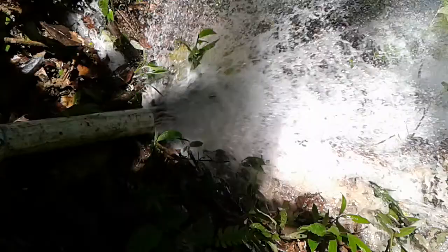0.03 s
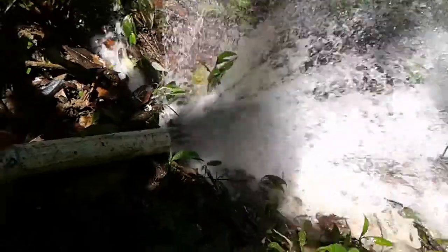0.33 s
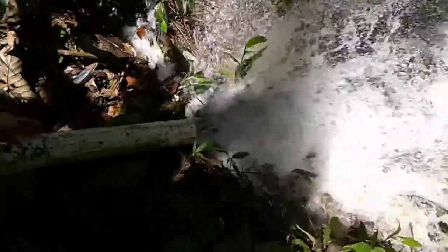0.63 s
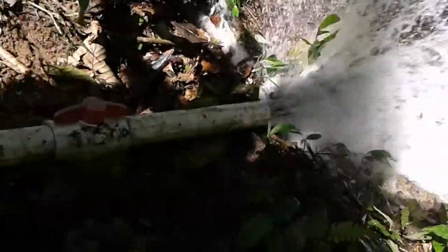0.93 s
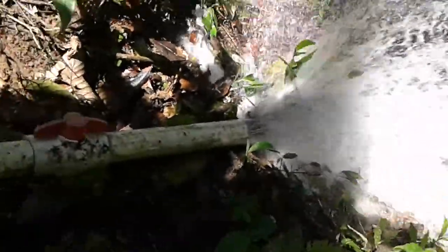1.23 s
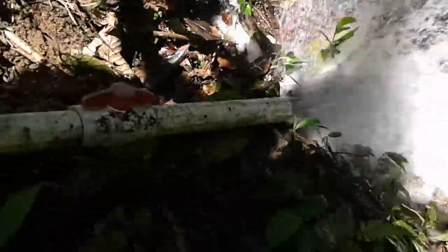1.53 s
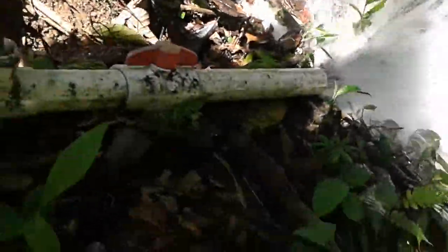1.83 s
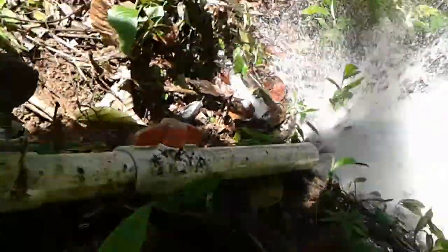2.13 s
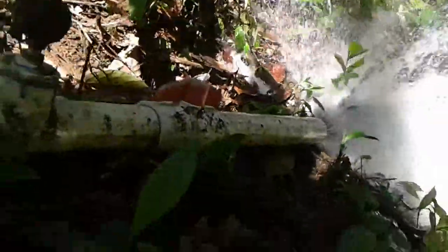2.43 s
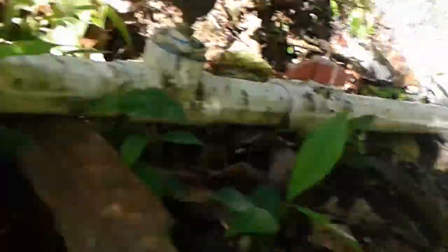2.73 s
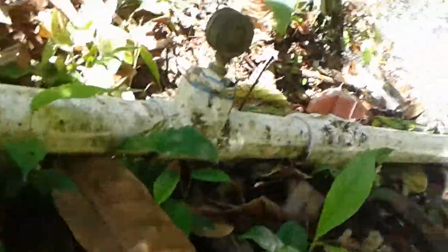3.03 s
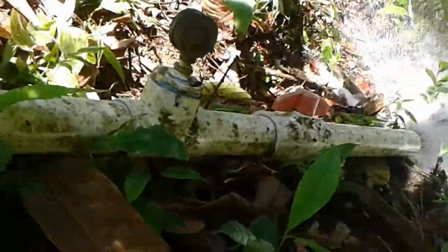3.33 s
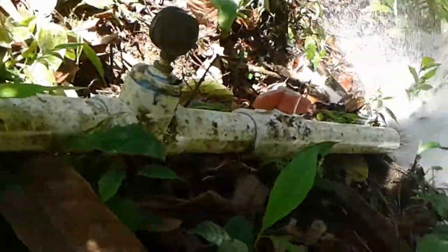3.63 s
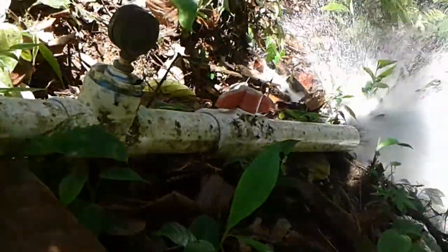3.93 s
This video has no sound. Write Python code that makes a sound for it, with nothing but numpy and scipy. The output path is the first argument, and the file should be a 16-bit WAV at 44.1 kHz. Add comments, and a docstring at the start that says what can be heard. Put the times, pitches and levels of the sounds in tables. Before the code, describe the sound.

A steady hissing jet of water gushes from a pipe and splashes onto the ground outdoors.

```python
"""Water under pressure fans out of an open pipe end and beats on leaves and soil, outdoors.
After a short silence the spray fades in, mono and close to the nozzle: the jet hisses, fine droplets
crackle in it, heavier slugs splat on the ground and tiny bubbles ring. From about 1.5 s the microphone
backs away along the pipe, and at 1.9 s one larger bubble plinks. By 2.8 s the move has settled:
the hiss is softer, the body fuller, and the water runs on to the end."""
import sys
import numpy as np
from scipy import signal
from scipy.fft import rfft, irfft
from scipy.io import wavfile
from scipy.ndimage import uniform_filter1d, map_coordinates

SR = 44100
rng = np.random.default_rng(int(sys.argv[2]) if len(sys.argv) > 2 else 0)


def store_pcm(level_fs):
    """Save levels as 16-bit WAV."""
    pcm = np.round(np.clip(level_fs, -1, 1) * 32767).astype(np.int16)
    wavfile.write(sys.argv[1], SR, np.atleast_2d(pcm).T)


N = 176400

# Tone of the spray beside the nozzle: frequency_hz, relative_gain_db
NOZZLE_EQ = [(20, -36), (45, -37), (90, -24.5), (155, -17), (290, -12), (420, -15), (520, -11), (720, -8),
             (1130, -9), (1400, -7), (1900, -5.5), (2250, -8), (2950, -9), (3700, -14), (4600, -7),
             (5500, -3), (6150, -4), (7200, 1), (7750, -0.9), (8200, -1), (9400, -7), (10600, -6.5),
             (11900, -9.5), (13900, -8), (15700, -11)]
# Tone of the spray beside the valve: frequency_hz, relative_gain_db
VALVE_EQ = [(20, -36), (45, -39), (90, -21.5), (155, -17), (270, -10.5), (390, -14), (650, -6), (800, -9.5),
            (1150, -9.5), (1800, -6), (2250, -10), (2700, -7), (3300, -9.5), (4000, -12.5), (5000, -7.5),
            (5800, -2.5), (6650, -4), (7300, -0.8), (7700, -0.3), (8400, -6), (8950, -9.5), (9450, -5.5),
            (10700, -6.5), (12100, -10), (13700, -9), (15100, -12), (15700, -14)]
# Tone of the spray from behind, further along the pipe: frequency_hz, relative_gain_db
PIPE_EQ = [(20, -34), (45, -37), (90, -22.5), (160, -11.5), (230, -14), (320, -10), (380, -12), (490, -5.5),
           (590, -11.5), (660, -7.5), (760, -9), (1050, -7.5), (1770, -5.5), (2150, -7), (3400, -9),
           (4100, -11.5), (5700, -4), (6500, -3.5), (7400, -0.5), (8800, -4.5), (9700, -4.5), (11000, -4),
           (12000, -11), (13700, -8), (15000, -12.5), (15700, -12.5)]
# The microphone's move: time_s, position (0 nozzle, 1 valve, 2 further along the pipe)
MIC_PATH = [(.7, 0.05), (1.45, 0.16), (1.85, 0.67), (2.35, 1.2), (2.8, 1.95), (4, 1.8)]
# Strength of the flow, a fader on the whole spray: time_s, level_db
FLOW_FADER = [(.7, -17.5), (1.2, -17.5), (1.75, -17.5), (2.3, -17), (2.8, -18), (3.3, -17.9), (4, -17.5)]
# Trim on the jet's hiss and crackle: time_s, gain_db
JET_TRIM = [(.6, -.7), (1.1, 0.23), (1.75, 0.53), (2.3, 0.1), (2.8, 0), (3.3, -0.2), (4, -0.5)]
# Lag of the ground bounce behind the direct sound: time_s, delay_ms
BOUNCE_DELAY = [(.5, 1.55), (1.3, 1.3), (2.1, 1.8), (2.4, 1.85), (2.8, 1.65), (3.4, 1.6), (4, 2.05)]
# Single loud bubbles: start_s, pitch_hz, level_db
PLINKS = [(1.9237, 4800, -11)]

CROSSOVER_HZ = 3850  # splatter lies below, hiss above
HISS_DB, DROPLETS_DB, WASH_DB, SPLATS_DB, BUBBLES_DB = -2, -4, -2.5, -4, -16.5  # balance before EQ


def jet():
    """The sheet of water hisses and sputters while its fine droplets tick."""
    hiss = amp(HISS_DB) * turbulence()
    droplets = amp(DROPLETS_DB) * unit(impacts(per_s=7000, spread_db=3))
    sputter = flutter(depth_db=0.46, rate_hz=90)
    return crossover((hiss + droplets) * sputter, "high") * amp(curve(JET_TRIM))


def splatter():
    """Water churns on the soil and heavier drops slap the leaves."""
    wash = amp(WASH_DB) * turbulence()
    splats = amp(SPLATS_DB) * unit(impacts(per_s=1800, spread_db=2.5))
    churn = flutter(depth_db=0.6, rate_hz=40)
    return crossover((wash + splats) * churn, "low")


def bubbles(low_hz=850, high_hz=5000, pitches=30, per_s=400, decay_cycles=12, glide=0.041):
    """Small bubbles ring briefly, each bending up in pitch."""
    fizz, t = np.zeros(N), np.arange(2048) / SR
    for hz in np.geomspace(low_hz, high_hz, pitches):
        age = t * hz / decay_cycles
        bend = 1 + glide * np.tanh(age / 2)
        ring = np.exp(-age) * np.sin(2 * np.pi * hz * t * bend)
        triggers = impacts(per_s / pitches, spread_db=3)
        fizz += np.sqrt(hz) * signal.oaconvolve(triggers, ring)[:N]  # lift the short, high rings
    return amp(BUBBLES_DB) * unit(fizz)


def plink(start_s, pitch_hz, level_db, attack_s=0.0005, decay_s=0.002):
    """One larger bubble rings out of the spray."""
    t = np.maximum(np.arange(N) / SR - start_s, 0)
    envelope = np.minimum(t / attack_s, 1) * np.exp(-t / decay_s)
    return amp(level_db) * envelope * np.sin(2 * np.pi * pitch_hz * t)


def ground_bounce(direct, gain=0.081, cutoff_hz=3500):
    """The ground throws back a faint, dull copy of the spray, with a drifting delay."""
    delay_samples = curve(BOUNCE_DELAY) * SR / 1000
    delayed = map_coordinates(direct, [np.arange(N) - delay_samples], order=3)
    return gain * signal.sosfiltfilt(signal.butter(1, cutoff_hz, fs=SR, output="sos"), delayed)


def moving_mic(water):
    """Backing along the pipe crossfades three perspectives on the same water."""
    views = [equalise(water, eq) for eq in (NOZZLE_EQ, VALVE_EQ, PIPE_EQ)]
    position = curve(MIC_PATH)
    blend = sum(np.maximum(1 - abs(position - k), 0) * view for k, view in enumerate(views))
    return blend / np.std(views[0])


def turbulence(patch_db=1.0, frame=256):
    """Noise with short-lived brighter and duller patches."""
    spectra = signal.stft(rng.standard_normal(N), nperseg=frame)[2]
    patches = uniform_filter1d(rng.standard_normal(spectra.shape), size=6, axis=0)  # smear in frequency
    patches = unit(uniform_filter1d(patches, size=12, axis=1))  # and in time
    return unit(signal.istft(spectra * amp(patch_db * patches), nperseg=frame)[1][:N])


def impacts(per_s, spread_db):
    """Random clicks, many small and a few large."""
    strength = amp(spread_db * np.minimum(rng.exponential(1, N), 5))
    return strength * rng.choice([-1, 1], N) * (rng.random(N) < per_s / SR)


def flutter(depth_db, rate_hz):
    """A gain that wobbles at random, up to about the given rate."""
    hz = np.fft.rfftfreq(N, 1 / SR)
    spectrum = rfft(rng.standard_normal(N)) * hz / (hz + 2) / (1 + (hz / rate_hz) ** 2)
    return amp(depth_db * unit(irfft(spectrum, N)))


def equalise(x, eq, size=4096):
    """Minimum-phase EQ, so that clicks keep their sharp attack."""
    hz, db = np.transpose(eq)
    bins_hz = abs(np.fft.fftfreq(size, 1 / SR))
    log_gain = np.log(amp(np.interp(np.log(bins_hz + 1), np.log(hz), db)))
    taps = np.fft.ifft(np.exp(np.conj(signal.hilbert(log_gain)))).real
    return signal.oaconvolve(x, taps[:size // 2])[:N]


def crossover(x, band):
    """Keeps the low or the high band."""
    return signal.sosfilt(signal.butter(3, CROSSOVER_HZ, band, fs=SR, output="sos"), x)


def curve(points):
    """An automation curve, one value per sample."""
    return np.interp(np.arange(N) / SR, *np.transpose(points))


def amp(db):
    """Decibels to gain."""
    return 10 ** (np.asarray(db) / 20)


def unit(x):
    """Scales to rms 1."""
    return x / np.sqrt(np.mean(x ** 2) + 1e-20)


def scene():
    """The gently surging spray, its ground bounce and the plink, alike on both channels."""
    water = (jet() + splatter() + bubbles()) * flutter(depth_db=0.3, rate_hz=8.9)
    direct = moving_mic(water) * amp(curve(FLOW_FADER))
    mono = direct + ground_bounce(direct) + sum(plink(*row) for row in PLINKS)
    return np.array([mono, mono])


def record(dry, fade_start_s=0.42, fade_s=0.28, cutoff_hz=15780):
    """A linear fade-in from silence, then a steep high cut."""
    fade = np.clip((np.arange(N) / SR - fade_start_s) / fade_s, 0, 1)
    high_cut = signal.firwin(801, cutoff_hz, window=("kaiser", 9), fs=SR)
    return signal.oaconvolve(dry * fade, high_cut[None], "same")


dry = scene()
out = record(dry)
store_pcm(out)
```